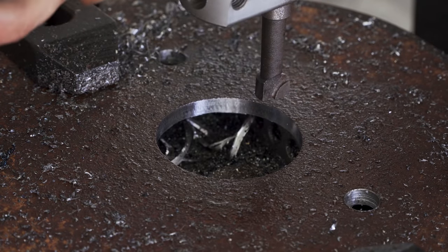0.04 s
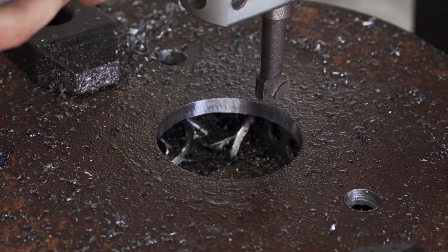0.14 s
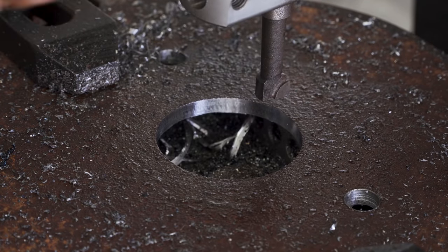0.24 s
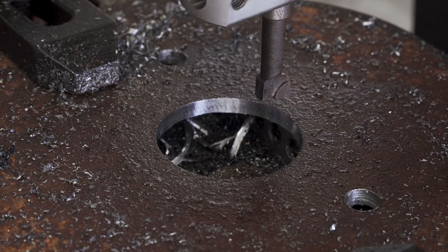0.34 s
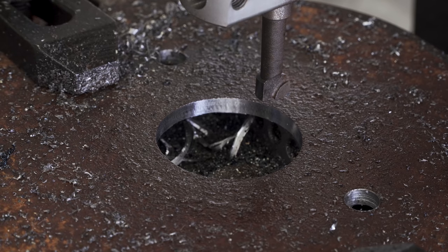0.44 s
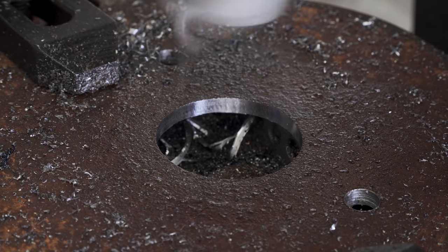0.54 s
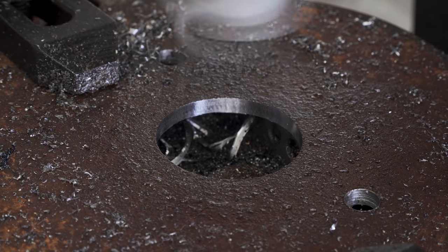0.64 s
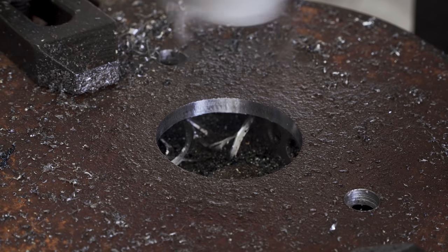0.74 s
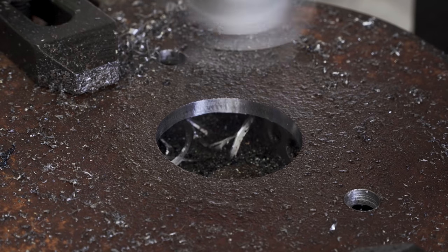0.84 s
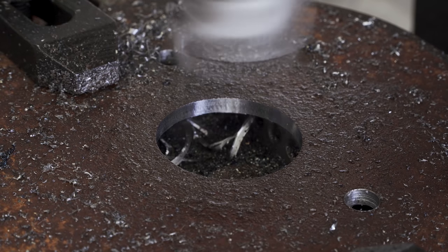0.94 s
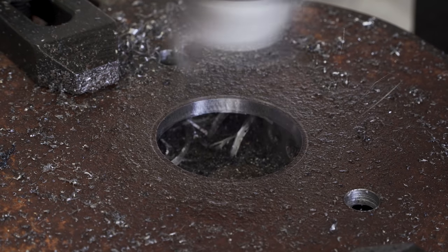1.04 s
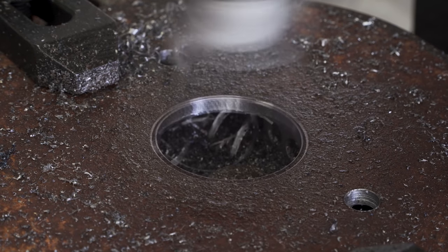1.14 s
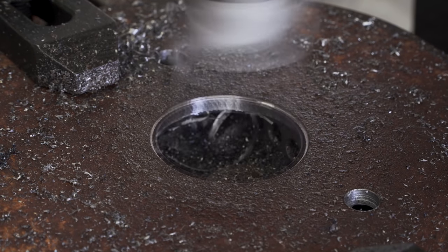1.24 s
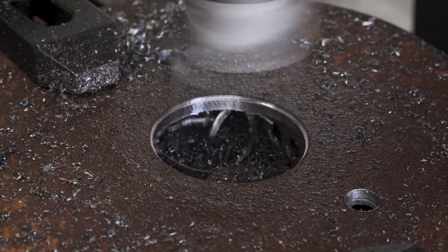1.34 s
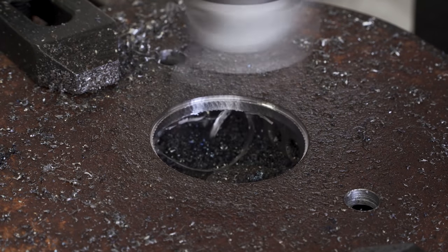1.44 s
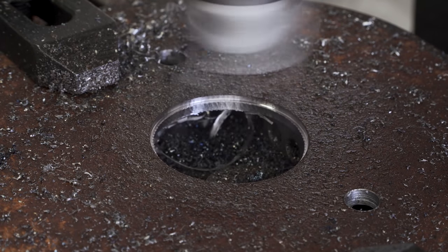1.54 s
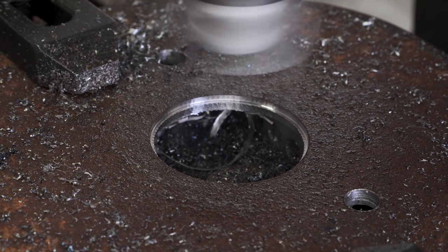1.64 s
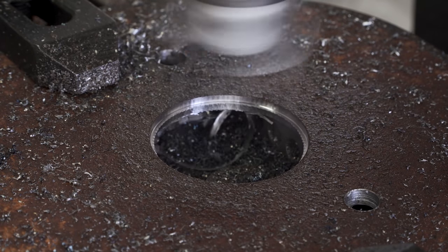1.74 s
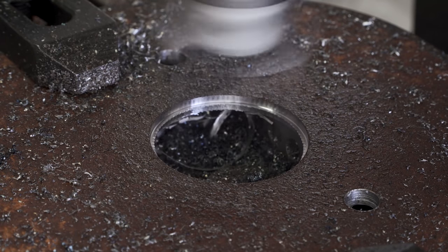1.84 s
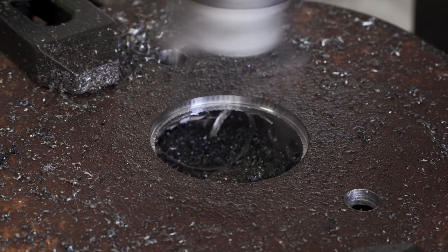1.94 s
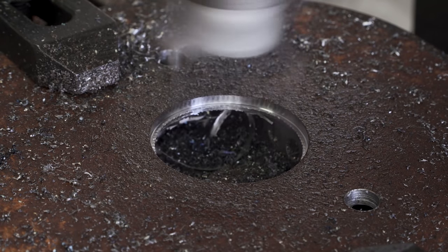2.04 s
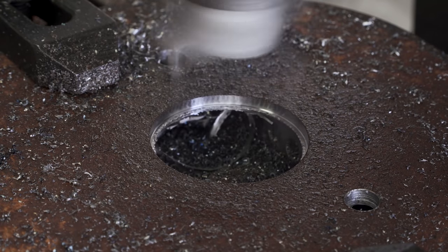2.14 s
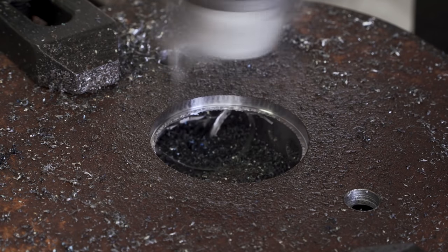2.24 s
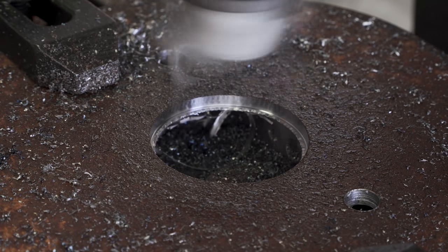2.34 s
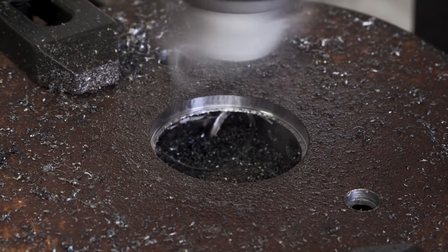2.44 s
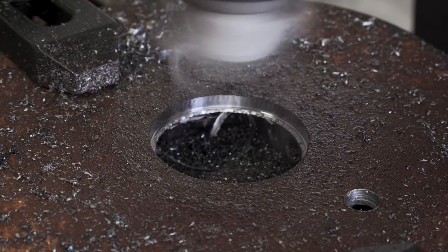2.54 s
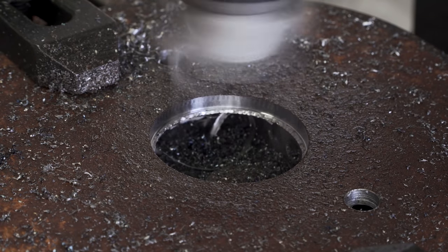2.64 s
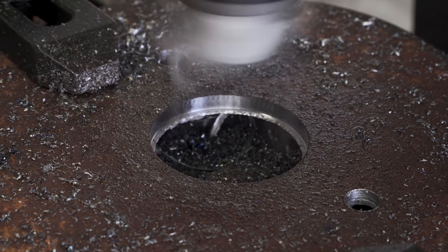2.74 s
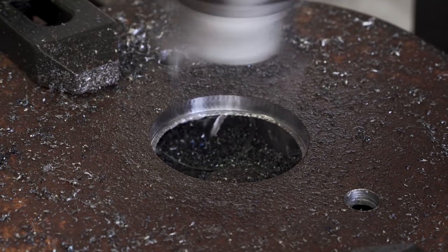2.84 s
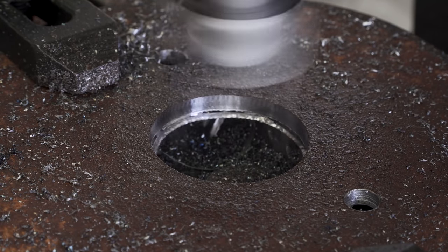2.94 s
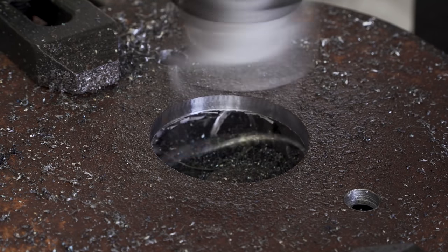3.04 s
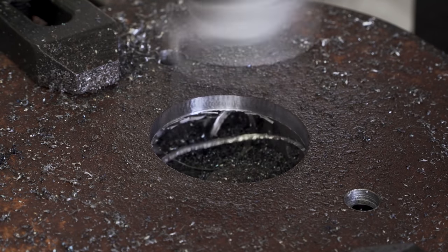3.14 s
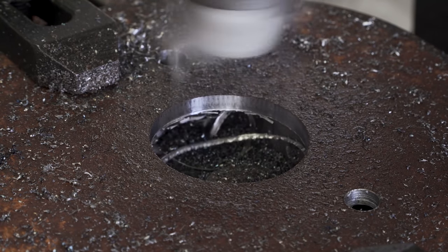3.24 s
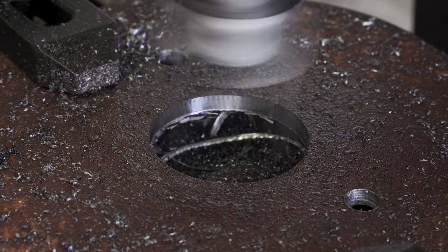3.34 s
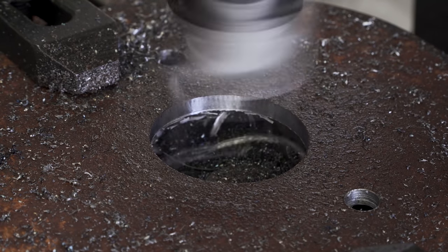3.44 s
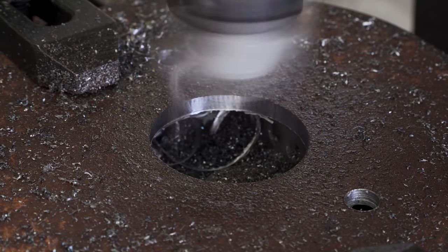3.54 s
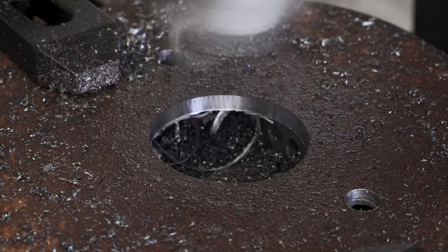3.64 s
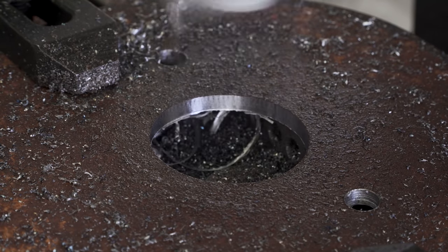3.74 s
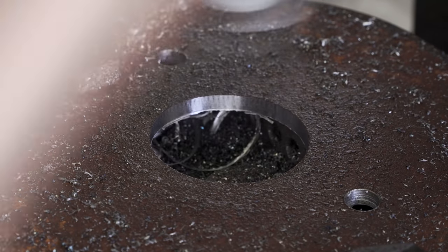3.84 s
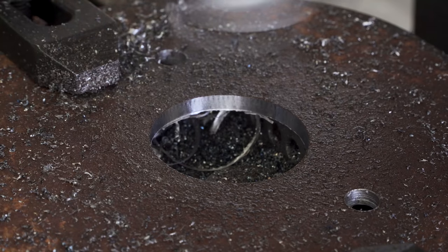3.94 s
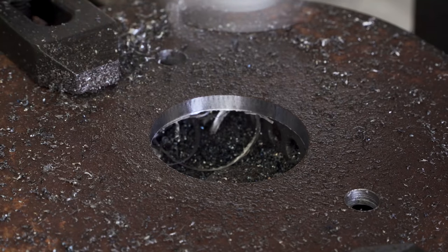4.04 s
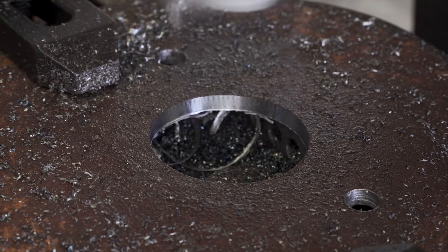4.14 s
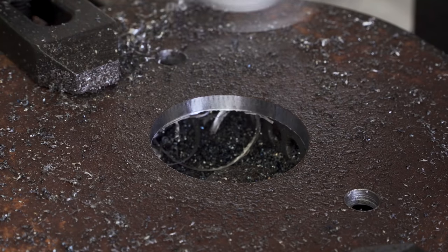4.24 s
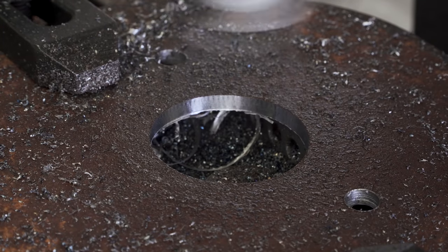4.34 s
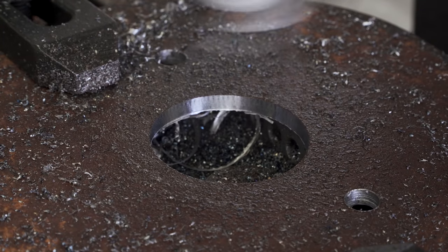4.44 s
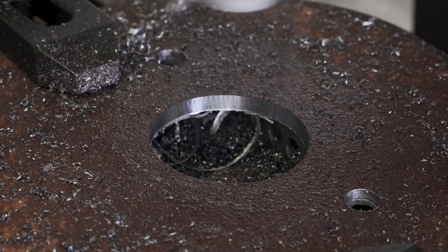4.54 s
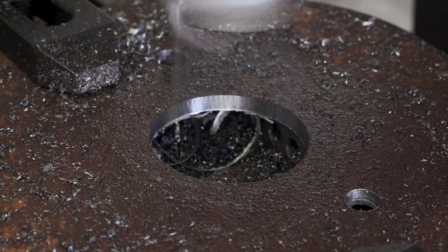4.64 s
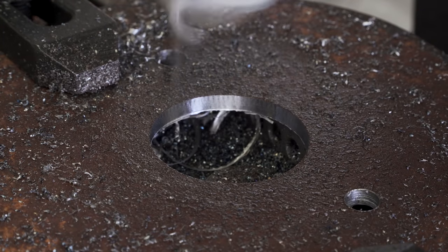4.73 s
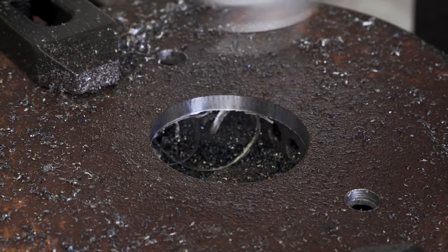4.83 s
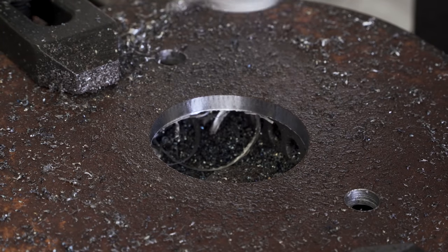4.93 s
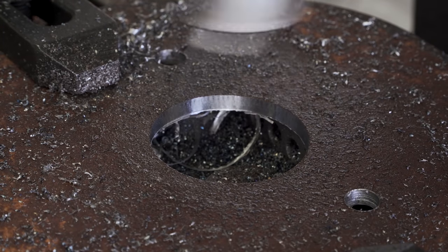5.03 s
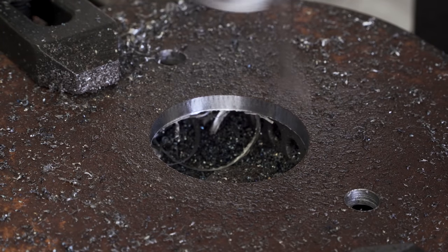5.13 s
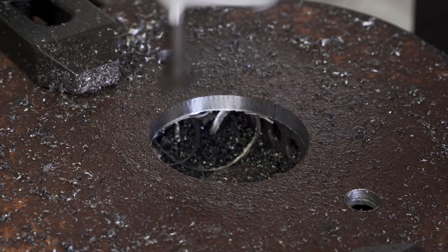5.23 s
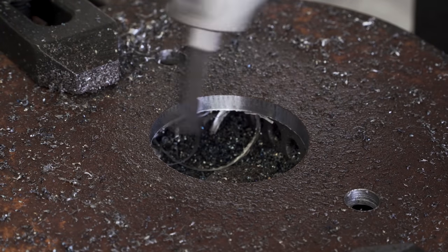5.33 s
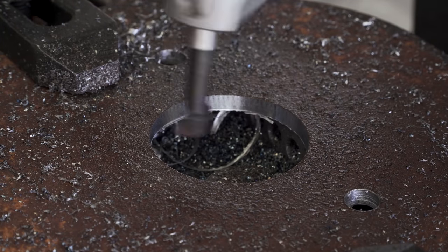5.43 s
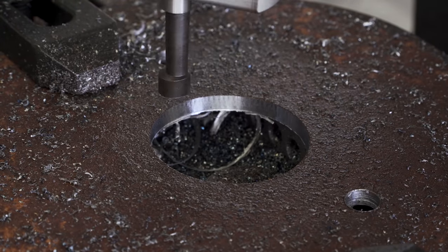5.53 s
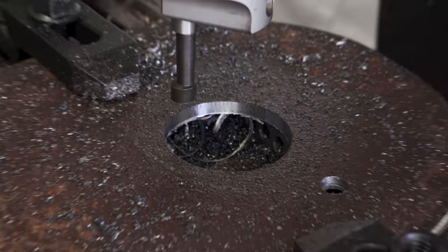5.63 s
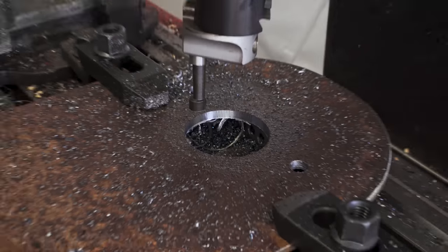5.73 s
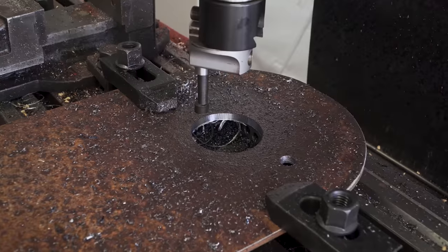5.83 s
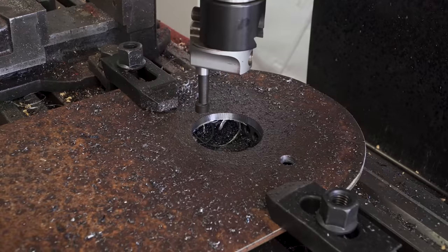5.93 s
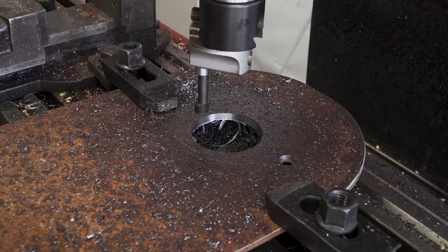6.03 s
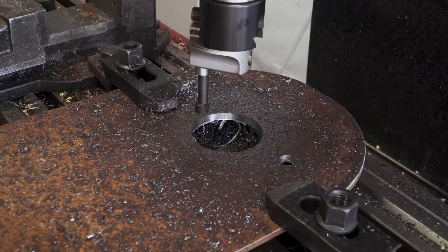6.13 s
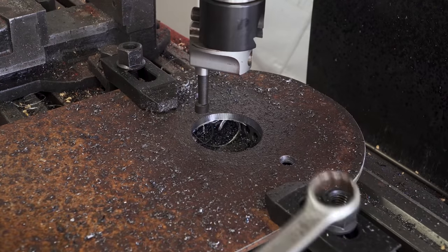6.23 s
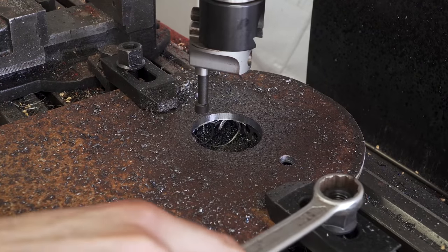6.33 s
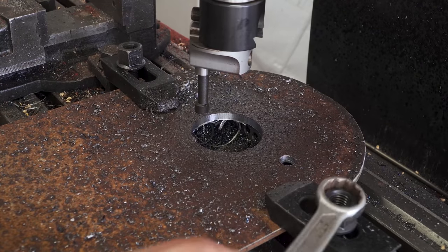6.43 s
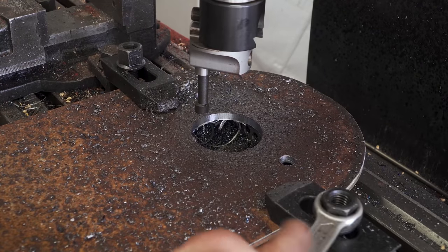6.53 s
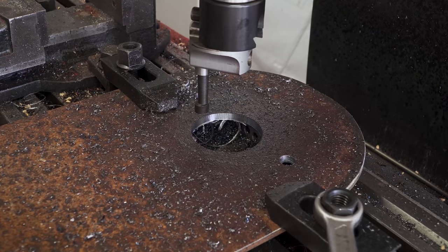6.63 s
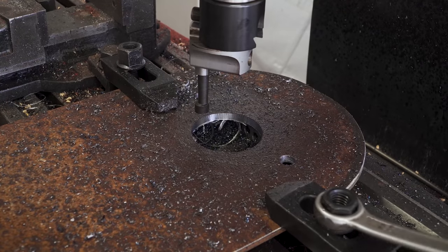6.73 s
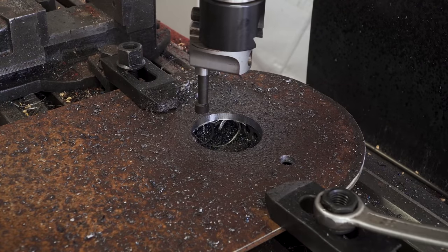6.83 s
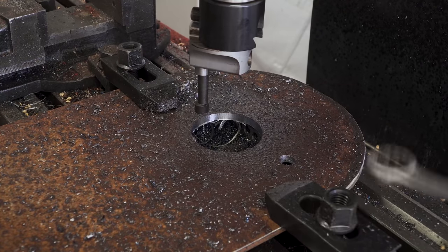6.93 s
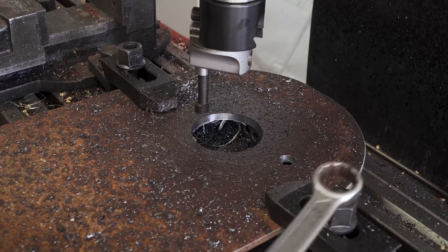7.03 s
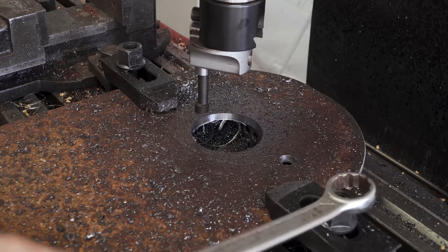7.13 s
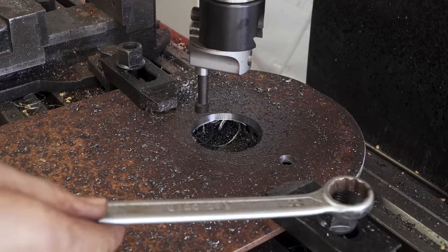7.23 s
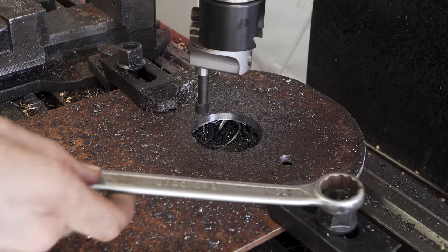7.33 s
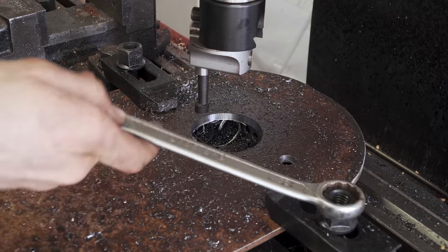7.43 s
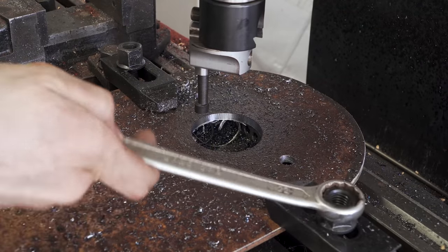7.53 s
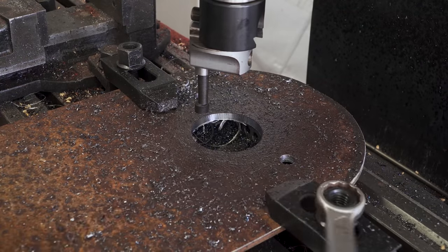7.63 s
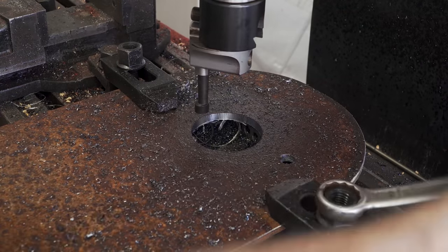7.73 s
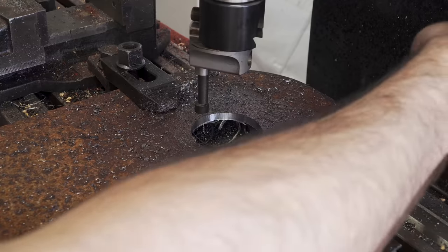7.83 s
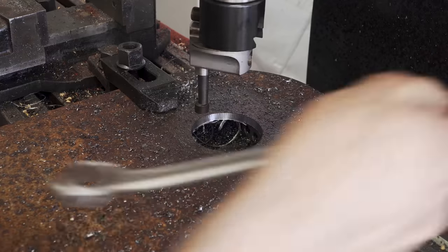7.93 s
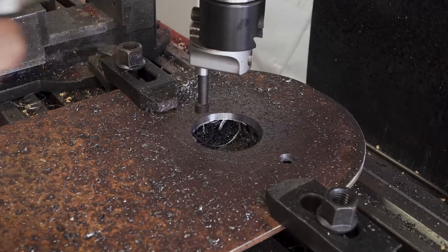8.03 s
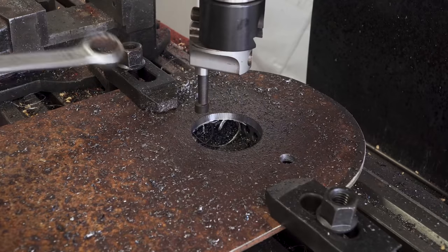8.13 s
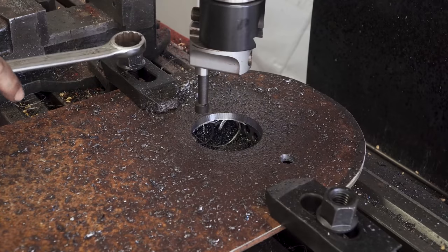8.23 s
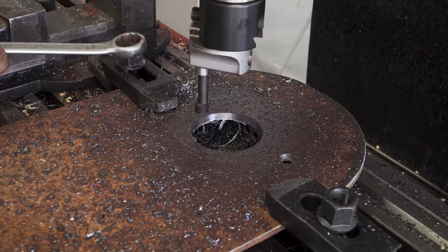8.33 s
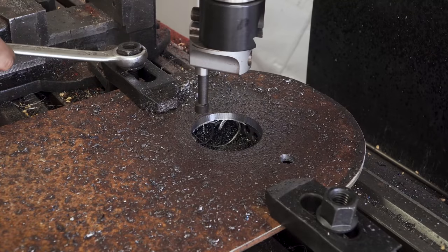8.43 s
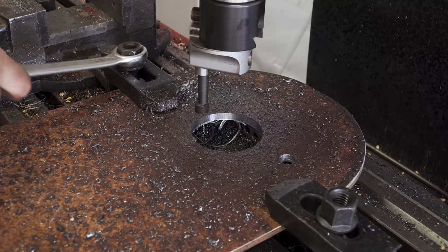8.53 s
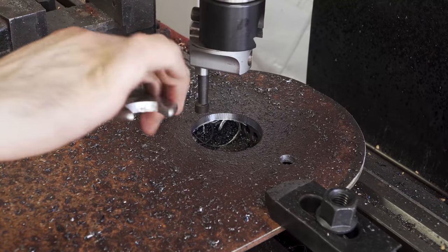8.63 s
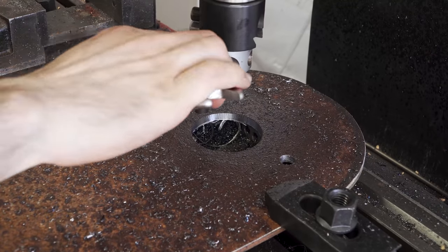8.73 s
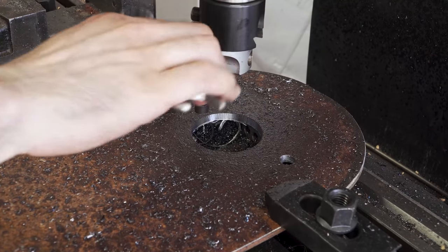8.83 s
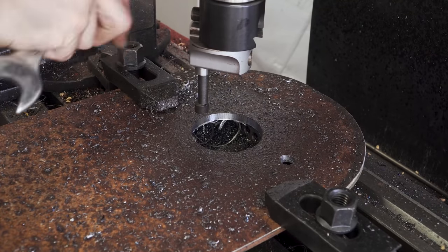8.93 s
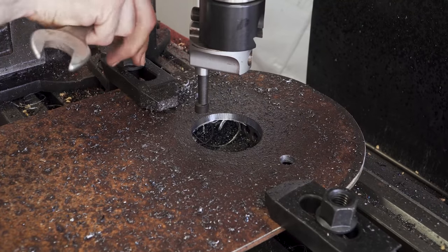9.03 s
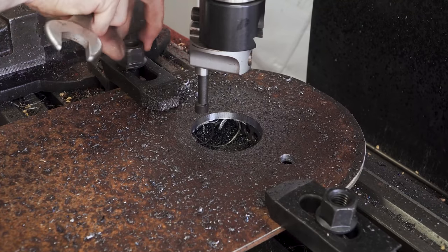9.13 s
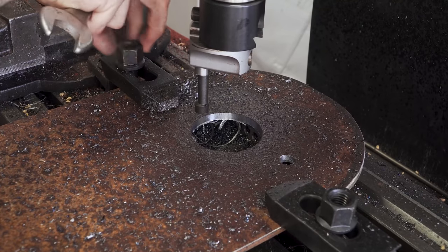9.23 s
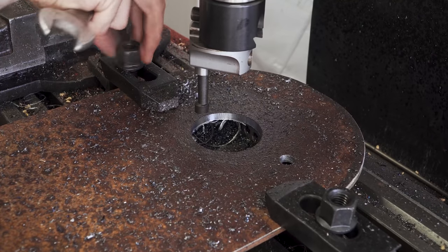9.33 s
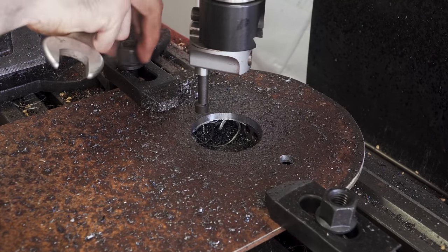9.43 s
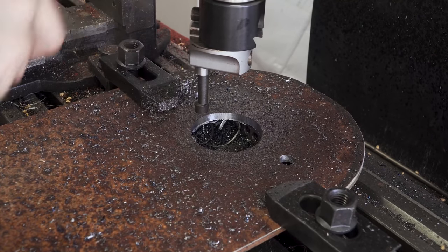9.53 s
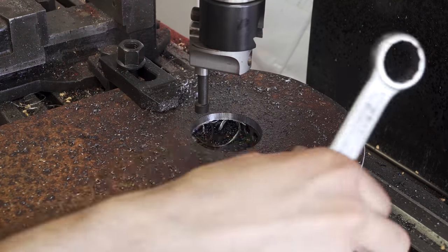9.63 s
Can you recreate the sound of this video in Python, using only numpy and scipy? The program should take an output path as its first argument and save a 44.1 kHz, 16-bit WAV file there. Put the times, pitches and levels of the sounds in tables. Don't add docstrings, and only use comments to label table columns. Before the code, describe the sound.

A machine spindle clunks on and roars, its cutter squealing thinly against steel, then coasts down before a loose spanner knocks and rings on clamp nuts.

```python
import sys
import numpy as np
from scipy import signal
from scipy.fft import rfft, irfft, next_fast_len
from scipy.io import wavfile
from scipy.ndimage import uniform_filter1d

SR = 44100
rng = np.random.default_rng(int(sys.argv[2]) if len(sys.argv) > 2 else 0)


def persist_wave(psi):
    counts = np.round(np.clip(psi, -1, 1) * 32767).astype(np.int16)
    wavfile.write(sys.argv[1], SR, np.atleast_2d(counts).T)


def makeup_ratio(level_db):
    decades = np.asarray(level_db, float) / 20
    return 10 ** decades


N = 426447


def evened(x):
    return x / np.sqrt(np.mean(x ** 2) + 1e-20)


def ramp(t, start, length):
    return np.clip((t - start) / length, 0, 1)


def read(points, hz):
    f, value = np.transpose(points)
    return np.interp(np.log(hz + 1), np.log(f + 1), value)


def columns(rows, t, outside=None):
    s, *values = np.transpose(rows)
    return [np.interp(t, s, v, outside, outside) for v in values]


def peaks(modes, hz):
    return np.sqrt(sum(makeup_ratio(db) ** 2 / (1 + (2 * (hz - f) / width) ** 2) for f, width, db in modes))


def noise(gain):
    t = np.arange(N // 256 + 5) * 256 / SR
    hz = np.fft.rfftfreq(1024, 1 / SR)[:, None]
    a, b = rng.standard_normal((len(t), 513, 2)).T
    return signal.istft((a + 1j * b) * gain(t, hz), nperseg=1024, noverlap=768)[1][:N]


def coloured(x, gain):
    size = next_fast_len(len(x), True)
    return irfft(rfft(x, size) * gain(np.fft.rfftfreq(size, 1 / SR)), size)[:len(x)]


def waver(length, step):
    knots = rng.standard_normal(int(length / SR / step) + 2)
    return np.interp(np.arange(length) / SR / step, np.arange(len(knots)), knots)


ON_S, BITE_S, LIFT_S, OFF_S = .56, 1.1, 2.7, 4.29
BITE_TAKES_S, LIFT_TAKES_S, COAST_PER_S, COAST_EASES = .12, .22, .97, .22
LOADED = .987
TURN_HZ = 129.3


def shaft(t):
    load = ramp(t, BITE_S, BITE_TAKES_S) - ramp(t, LIFT_S, LIFT_TAKES_S)
    since = np.clip(t - OFF_S, 0, 2)
    speed = 1 - .03 * (1 - ramp(t, ON_S, .06)) - (1 - LOADED) * load
    speed = speed - COAST_PER_S * since + COAST_EASES * since ** 2
    return np.maximum(speed, .05), load


GEAR_HZ = 150
# centre_hz, width_hz, level_db
CASING_PEAKS = [(445.5, 20, -6.5), (800, 36, -3.5), (1600, 100, -5), (1135, 31, -14.5), (5270, 87, -9.5),
                (2045, 160, -4.5), (2420, 83, 0.0), (2765, 640, 0.5), (3745, 300, 2.5), (4300, 24, -13.5),
                (4230, 130, -3), (4400, 37, -2.5), (4860, 1700, -8.5), (5560, 46, -17.5),
                (9040, 290, -21.5)]


def tones(lines, speed, waver_db, casing_share, blur):
    slow = speed[::64]
    fine = np.arange(len(speed)) / 64
    turns = np.cumsum(speed) / SR
    coast = np.maximum(.98 - slow, 0)
    out = 0
    for hz, db in lines:
        swell = (peaks(CASING_PEAKS, hz * slow) / peaks(CASING_PEAKS, hz)) ** casing_share
        swell *= makeup_ratio(waver_db * waver(len(slow), 0.028 / 64))
        unbalance_db = 13 * np.minimum(coast / .1, 1) * (hz < GEAR_HZ)
        gear_loss_db = 14 * np.minimum(coast / .25, 1) * (GEAR_HZ < hz < 4 * GEAR_HZ)
        swell *= makeup_ratio(unbalance_db - gear_loss_db)
        drift = (0.14 + 1.45 * coast) * np.minimum(hz / 1500, 1) * waver(len(slow), .035 / 64)
        drift += rng.random()
        drift += blur * hz / 5000 * waver(len(slow), 0.0033 / 64)
        swell, drift = (np.interp(fine, np.arange(len(v)), v) for v in (swell, drift))
        out = out + makeup_ratio(db + 6.5) * swell * np.sin(2 * np.pi * (hz * turns + drift))
    return out


WARM_S, WARM_LOW_DB, WARM_HIGH_DB = 0.036, 22.5, -27
LOW_DB, SLOW_LOW_DB = 2.5, 30
HIGH_DB, SLOW_HIGH_DB, LOAD_HIGH_DB, BITE_HIGH_DB = -3, -14, 5.5, 7
BANDING = 1.1
DRIVEN_DB, LOAD_DAMPS_DB, OFF_DROP_DB, DYING_DB = -1.5, -5.5, -7, -30
FREE_BLUR, CUT_BLUR, COAST_BLUR = .08, .1, .16
MESH_HZ, MESH_DB = 98.9, -63.5
MESH_ORDERS = (6, 7, 9, 10, 11, 12)
# time_s, level_db; the level drops steeply near 1.1 s
ROAR = [(.56, -33), (.575, -13.5), (1.09, -16.5), (1.14, -21), (1.19, -31), (3.0, -32), (4.6, -28),
        (5.0, -29.5), (5.36, -33), (5.55, -45), (5.6, -68)]
# pitch_hz, level_db (per Hz)
CASING = [(24, -76), (40, -52), (194, -31), (337, -28), (392, -23.5), (646, -17), (790, -12), (990, -6.5),
          (1590, -9), (1900, -8), (3830, 2), (5440, -0.5), (8550, -7), (10700, -8.5), (16000, -22.5)]
# centre_hz, width_hz, depth (0-1)
NOTCHES = [(2256, 90, .5), (3240, 160, 0.2), (5500, 130, .3)]
# pitch_hz, level_db
FREE_LINES = [(131, -81), (198.5, -75.5), (495, -62.5), (398.4, -61.5), (791.3, -47.5), (1680, -55.5),
              (3068, -49.5), (3268, -54.5), (3418, -54.5), (3935, -46.0), (4221, -54.5), (4484, -46.5),
              (4619, -49.5), (4996, -48.5), (5259, -46), (5572, -49.5), (5701, -47.5), (5814, -50.5),
              (6368, -48.5), (7472, -59.0), (7736, -53.5), (10325, -53.5)]
# pitch_hz, level_db
CUT_LINES = [(780.6, -58), (931, -64.5), (1071, -67), (1378, -60.5), (2654, -70.5), (2912, -63.5),
             (2993, -61.5), (3203, -59), (3402, -52.5), (3849, -67), (4517, -45), (5125, -49),
             (5577, -53.5), (5706, -47.5), (6379, -45.5), (6514, -42), (7564, -52)]
# free_pitch_hz, level_db, after_off_s, spread_s
COAST_LINES = [(3268, -43.5, .32, .05), (3268, -50, .18, .08), (4484, -47, .16, .09), (5259, -50, .2, .08),
               (5700, -45, .1, .09), (5700, -45, .26, .07), (5700, -43, .39, .04), (6650, -52, .07, .05),
               (6950, -47, .25, .06), (6600, -46, .49, .04), (7736, -46, .33, .06), (7470, -47, .6, .04),
               (495, -62, .13, .06), (692, -63, .39, .05), (791, -62, .3, .05), (791, -62, .53, .04)]


def spindle():
    def colour(t, hz):
        speed, load = shaft(t)
        warm = np.exp(-np.maximum(t - ON_S, 0) / WARM_S)
        bite = np.exp(-((t - BITE_S - .04) / 0.045) ** 2)
        low = LOW_DB + WARM_LOW_DB * warm + SLOW_LOW_DB * (1 - speed) ** 2
        high = HIGH_DB + WARM_HIGH_DB * warm + SLOW_HIGH_DB * (1 - speed)
        high = high + LOAD_HIGH_DB * load + BITE_HIGH_DB * bite
        place = np.interp(hz, [330, 420, 900, 3000, 6000, 9500, 14000], [.85, 0, 0, 1, 1, 2, 3])
        tilt = sum(np.maximum(1 - abs(place - k), 0) * c for k, c in ((0, low), (2, high), (3, high - 3)))
        bands = peaks(CASING_PEAKS, hz)
        bands = bands / uniform_filter1d(bands, size=35, axis=0)
        for f, width, depth in NOTCHES:
            bands = bands * (1 - depth / (1 + (2 * (hz - f) / width) ** 2))
        return makeup_ratio(read(CASING, hz) + tilt) * bands ** (BANDING + (1 - speed) / 2)

    first, last = round(ROAR[0][0] * SR), round(ROAR[-1][0] * SR)
    t = np.arange(first, last) / SR
    speed, load = shaft(t)
    roar = noise(colour)[first:last]
    roar /= np.sqrt(uniform_filter1d(roar ** 2, size=8000))
    throb = 1 + 0.14 * np.cos(2 * np.pi * np.cumsum(speed * TURN_HZ / LOADED) / SR)
    flutter = makeup_ratio(0.43 * (2.0 - speed) * waver(len(t), 0.019))

    since = np.maximum(t - OFF_S, 0)
    driven_db = DRIVEN_DB - 6 * (1 - ramp(t, ON_S, 0.3)) + LOAD_DAMPS_DB * load
    driven_db = driven_db + OFF_DROP_DB * ramp(t, OFF_S, 0.11) + DYING_DB * since ** 2.8
    free_lines = FREE_LINES + [(k * MESH_HZ, MESH_DB) for k in MESH_ORDERS]
    free = tones(free_lines, speed, 3.0, 0.8, FREE_BLUR) * makeup_ratio(driven_db)
    off = since > 0
    for hz, db, top, spread in COAST_LINES:
        meeting = np.exp(-((since[off] - top) / spread) ** 2 / 2)
        free[off] += tones([(hz, db + 4)], speed[off], 3.2, 0, COAST_BLUR) * meeting
    chip = makeup_ratio(1.2 * waver(len(t), 0.055))
    cut = tones(CUT_LINES, speed / LOADED, 3.2, 0, CUT_BLUR) * load * chip
    out = np.zeros(N)
    mix = makeup_ratio(-0.5) * roar * throb * flutter + makeup_ratio(31.5) * free + makeup_ratio(33.5) * cut
    out[first:last] = makeup_ratio(columns(ROAR, t)[0]) * mix
    return out


THRUM_DB, RUB_DB, RUB_LIFT_DB, CLEAR_S = -54.5, -56, 17, 3.04
GRAZE_DB_PER_S, GRAZE_SAG_DB_PER_S = 1298, 120
GRAZE_SQUEAL_DB, GRAZE_THRUM_DB, GRAZE_RUB_DB = -35.5, -53.5, -48
RUB_LEAD_S = .025
# time_s, level_db
CHATTER = [
    (1.0, -60),
    (1.06, -27.5),
    (1.3, -23),
    (1.8, -21.5),
    (1.9, -30.5),
    (2.6, -58),
    (3.03, -44),
    (3.06, -80),
]
# start_s, length_s, level_db
TOUCHES = [
    (3.172, .002, 4.5),
    (3.275, .15, 1.5),
    (3.688, .004, 1.5),
]


def contact(t):
    lift = ramp(t, LIFT_S, CLEAR_S - LIFT_S)
    thrum_db = THRUM_DB - 25 * (1 - ramp(t, 1.0, .08)) - 30 * lift ** 3 - 30 * (t > CLEAR_S)
    rub_db = RUB_DB + RUB_LIFT_DB * lift ** .7 - 30 * ramp(t, CLEAR_S, .02)
    levels = [columns(CHATTER, t)[0], thrum_db, rub_db]
    for s, length, db in TOUCHES:
        after = t - s - length
        near_db = db - GRAZE_DB_PER_S * np.maximum(np.maximum(s - t, after), 0)
        rub_near_db = db - GRAZE_DB_PER_S * np.maximum(np.maximum(s - RUB_LEAD_S - t, after), 0)
        sag_db = GRAZE_SAG_DB_PER_S * np.maximum(t - s, 0)
        graze = [GRAZE_SQUEAL_DB + near_db - sag_db,
                 GRAZE_THRUM_DB + 0.94 * near_db - 0.54 * sag_db,
                 GRAZE_RUB_DB + rub_near_db]
        levels = np.maximum(levels, graze)
    return levels


SQUEAL_HZ, CREEP_HZ_PER_S, LIFT_HZ = 12412, 12, 314
# pitch_hz, level_db
SQUEAL_LINES = [(11892, -51), (12032, -46), (12161, -37), (12290, -34), (12419, -33), (12548, -31),
                (12667, -46), (12812, -51)]


def cutter():
    t = np.arange(SR, 4 * SR) / SR
    squeal_db, thrum_db, hiss_db = contact(t)
    turns = np.cumsum(TURN_HZ * shaft(t)[0] / LOADED) / SR
    carrier_hz = SQUEAL_HZ + CREEP_HZ_PER_S * (t - 1) + LIFT_HZ * ramp(t, LIFT_S, LIFT_TAKES_S)
    carrier = np.cumsum(carrier_hz + 14 * waver(len(t), .012)) / SR
    squeal = 0
    for hz, db in SQUEAL_LINES:
        k = round((hz - SQUEAL_HZ) / TURN_HZ)
        phase = 2 * np.pi * (carrier + k * turns) + 0.38 * k ** 2
        squeal = squeal + makeup_ratio(db + 2.3 * waver(len(t), 0.0098)) * np.cos(phase)
    shake = evened(coloured(rng.standard_normal(len(t)),
                            lambda hz: peaks([(149.7, 1200, 0)], hz) ** 2 * np.minimum(hz / 70, 1) ** 2))
    thrum = np.sin(2 * np.pi * turns) + makeup_ratio(-4.0) * np.sin(4 * np.pi * turns) + makeup_ratio(-7.5) * shake
    hiss = evened(coloured(rng.standard_normal(len(t)), lambda hz: peaks([(14200, 6100, 0)], hz) ** 3))
    touch = makeup_ratio(hiss_db) * hiss + makeup_ratio(squeal_db) * evened(squeal) + makeup_ratio(thrum_db + 1.0) * thrum
    out = np.zeros(N)
    out[SR:SR + len(t)] = touch
    return out


RING_WAVER_DB = 2.2


def rings(rows):
    out = np.zeros(N + SR)
    for start, stop, hz, db, t60 in rows:
        length = stop - start
        t = np.arange(round((length + 0.0083) * SR)) / SR
        grip = np.clip((length + 0.0044 - t) / 0.012, 0, 1) * np.minimum(t / 0.0022, 1)
        beat_db = RING_WAVER_DB * waver(len(t), 0.016) * (t60 > .4)
        out[round(start * SR):][:len(t)] += makeup_ratio(db - 60 * t / t60 + beat_db) * grip * np.sin(2 * np.pi * hz * t)
    return out[:N]


# time_s, level_db, length_s
START = [
    (0.561, -1.5, 0.017),
]
# start_s, stop_s, pitch_hz, level_db, t60_s
START_RINGS = [
    (.562, .62, 320, -27, .15),
    (.5645, .597, 800, -14, .5),
    (.561, .592, 2450, -13, .1),
    (.596, .633, 3740, -16, .5),
    (4.295, 4.335, 310, -56, .2),
    (5.53, 5.592, 800, -53, .5),
]


def clunk():
    def casing(hz):
        modes = [(800, 300, -12.5), (350, 230, -8.5), (2630, 640, 2.0)]
        return peaks(modes, hz) * np.minimum(hz / 260, 1) ** 2

    out = np.zeros(N)
    t = np.arange(4096) / SR
    for s, db, length in START:
        burst = rng.standard_normal(4096) * makeup_ratio(-60 * t / (3 * length))
        slam = evened(coloured(burst, casing)) / 4 * (1 - ramp(t, .05, .02))
        out[round(s * SR):][:4096] = makeup_ratio(db - 11.0) * slam
    return out + rings(START_RINGS)


DAMPED_HZ = 48
DENSE_DB, RAGGED_DB = -7, 3.7
SWELL_POWER, RATTLE_FALL = 1.7, 1.05
STRIKE_SPREAD_DB, STRIKE_DETUNE = 2.5, .012
# pitch_hz, level_db (per Hz)
STEEL = [(120, -69.5), (200, -32), (548, -28.5), (791, -27.5), (1480, -29.5), (2250, -1), (3250, 0.5),
         (4270, -2), (9580, -3.5), (14000, -16), (16000, -36)]
# centre_hz, width_hz, level_db
TABLE = [(780, 40, -10.5), (1058, 300, -18), (500, 250, -29)]


def knock(modes, rise, db, treble_db, length, chance, burst):
    t = (np.arange(len(burst)) - 1024) / SR
    hz = np.fft.rfftfreq(len(burst), 1 / SR)
    swell_db = 10 * (np.maximum(-t, 0) / max(rise, .0003)) ** SWELL_POWER
    fall_db = swell_db + 11 * (np.maximum(t, 0) * 6 / max(length, .004)) ** RATTLE_FALL
    ragged = np.repeat(burst[::-40], 40)[:len(t)]
    rattle = burst * makeup_ratio(RAGGED_DB * ragged - np.minimum(fall_db, 150))
    body = 0
    for (f, width, level), c in zip(modes, chance):
        tuned_hz = f * (1 + STRIKE_DETUNE * np.tanh(chance[-1] - c))
        body = body + makeup_ratio(level + STRIKE_SPREAD_DB * c) / (1 + 2j * (hz - tuned_hz) / max(width, DAMPED_HZ))
    body = body * np.clip(hz / 1750, 0, 1) ** 3
    table = sum(makeup_ratio(level) / (1 + 2j * (hz - f) / width) for f, width, level in TABLE)
    table = table * np.clip(hz / 400, 0, 1) ** 2
    tilt = makeup_ratio(1.3 * (treble_db + 9.5) * np.clip(np.log2(hz / 3500 + 1e-9), 0, 1))
    patches = makeup_ratio(2.6 * np.interp(hz / 260, np.arange(100), burst[:100]))
    dense = patches * makeup_ratio(read(STEEL, hz) + DENSE_DB)
    sound = irfft(rfft(rattle) * tilt * (body + table + dense), len(burst))
    return makeup_ratio(db - 5) * sound / np.sqrt(uniform_filter1d(sound ** 2, size=90).max())


STRIKE_RISE_S, SLIDE_RISE_S = 0.0016, 0.0068
# centre_hz, width_hz, level_db
GRIPS = [
    [(3760, 1000, 1)],
    [(2054, 58, -4), (2475, 33, -10), (3620, 73, 13), (3870, 55, 6), (4340, 40, -5), (4770, 60, -1),
     (5570, 60, -8), (6530, 30, 0), (6910, 54, 1.5), (8490, 80, -5), (9880, 120, 2), (11400, 120, -3)],
    [(1850, 28, -3), (2470, 34, 6.5), (3285, 90, 17), (3760, 110, 4), (3940, 46, -9), (4660, 30, -10),
     (4880, 60, 6), (5600, 42, 2), (6400, 45, -10), (7650, 64, -18), (8910, 110, -4), (9400, 80, 1),
     (9870, 80, 0)],
    [(990, 930, 1), (1860, 80, -1), (3290, 57, 3), (3800, 200, 5), (4930, 90, -12)],
]
# centre_hz, width_hz, level_db
FAR_GRIPS = [
    [(2253, 71, 17.5), (3500, 74, -2), (4730, 100, 4), (6560, 90, -9), (7500, 110, -12)],
    [(2280, 37, -3), (3195, 40, 16.5), (3550, 46, 0), (4190, 40, -7), (6500, 110, 6), (6750, 52, -3),
     (7200, 53, 0), (11000, 120, 0)],
    [(1110, 69, -1.5), (2300, 40, 2), (3170, 96, 4), (3570, 160, 4), (4580, 110, -1), (5850, 160, 2),
     (6550, 120, 4), (6880, 49, 0), (7310, 47, -11), (8650, 100, -10), (9700, 170, -13), (11300, 150, -11)],
    [(1110, 46, 11), (2150, 58, 13), (2980, 40, 6.5), (3430, 57, -5), (4570, 90, -4)],
    [(1080, 42, 8), (2180, 33, 5.5), (2510, 75, 9), (2920, 27, 6), (4440, 33, 6), (6040, 130, 0),
     (6440, 46, -1), (6690, 40, -11), (8360, 40, -16)],
    [(1090, 69, 4.5), (2020, 100, 1), (2570, 78, 0.5), (3040, 350, 3), (3740, 92, 0.5), (5240, 60, -3),
     (5660, 160, -18), (6340, 50, -2), (6560, 47, 4.5), (7170, 150, -5), (11000, 92, -17)],
]
# centre_hz, width_hz, level_db
SCUFF_GRIP = [(1900, 440, -18), (1200, 500, 2)]
# peak_s, level_db, treble_db, rattle_s
TICKS = ([(.11, -44, -20, .015), (.184, -44, -19, 0.015), (.246, -52, -14, .01), (.3, -52, 8, .015),
          (.5, -54, -20, .01), (.537, -44, 0, 0.015), (5.968, -55, 8, .006), (6.087, -48, 0, .02),
          (5.553, -42, -16, 0.018)], [(5.625, -47.5, 0, 0.069)])
# peak_s, level_db, treble_db, rattle_s
FIT = ([(6.2774, -39, -9, 0.14), (6.3205, -11, -2.5, 0.075), (6.3775, -22, -2, 0.04),
        (6.3994, -18.5, -29, 0.02), (6.4975, -8.5, -9, 0.045), (6.5185, -9, -11, 0.045)],
        [(6.2192, -37, -2, .045), (6.3416, -26.5, -21, 0.098), (6.529, -12, -16, 0.018),
        (6.389, -21, -8, .07), (6.479, -30, -14, .06), (6.4905, -21, -12, .012)])
# peak_s, level_db, treble_db, rattle_s
TURN = ([(6.9088, -35.5, -3, .042), (6.951, -17, -14, 0.03), (7.0905, -13, 0, 0.14),
         (7.275, -41, -12, 0.43), (7.3784, -19, -8, 0.036), (7.593, -40, -16, .02), (7.563, -37, -8, 0.025),
         (7.455, -16, -14, 0.011), (7.4707, -11, -14, 0.05), (7.5283, -15, -20, .019)],
         [ (6.7, -39, 2, .12), (7.087, -29, 0, .006), (7.128, -17, -8, 0.06), (7.1478, -19, 4, 0.035),
         (7.1729, -23.5, -8, 0.062), (7.1902, -25.5, -13, 0.026), (7.2048, -30, -26, 0.039),
         (6.871, -26, -20, 0.039), (7.3285, -15, -13, 0.073), (7.3385, -11, -9, 0.052),
         (7.3709, -23, -20, 0.015), (7.414, -20, -18, 0.05), (7.4856, -14, -9.5, 0.016)])
# peak_s, level_db, treble_db, rattle_s
DRAG = ([(8.8, -48, -10, 0.03), (6.9, -45, -12, .02)], [(6.78, -50, -16, .1), (6.817, -47, -6, .04),
         (7.645, -43, -12, 0.3), (7.79, -44, -16, .03)])
# peak_s, level_db, treble_db, rattle_s
LIFT = ([(7.8451, -34, -4, 0.018), (7.855, -33, -20, .03), (7.8636, -35, -9, 0.02)],
         [(7.8911, -19, -19, 0.025)])
# peak_s, level_db, treble_db, rattle_s
TRY = ([(8.2454, -13.5, 3, 0.026), (8.252, -18, -6, 0.057)], [(8.3025, -30, -11, 0.065)])
# peak_s, level_db, treble_db, rattle_s
SEAT = ([(8.3408, -13.5, -14, 0.009), (8.3553, -13.5, -22, 0.014), (8.388, -14, -3, 0.015),
         (8.4091, -11.5, -16, .015), (8.476, -17, -10, 0.04)], [(8.4838, -9.5, 0, 0.065),
         (8.336, -29, -10, .03)])
# peak_s, level_db, treble_db, rattle_s
SETTLE = ([(8.5265, -32, -12, 0.023), (8.5657, -37, -22, 0.039), (8.5753, -36, -15, 0.057)],
           [(8.5444, -38, 5.9, .029)])
# peak_s, level_db, treble_db, rattle_s
SLIP = ([(8.8395, -38, -11, .03)], [(8.8466, -37, -5, 0.032), (8.884, -26, -5, 0.073),
         (8.8962, -19.5, -4.5, 0.017)])
# peak_s, level_db, treble_db, rattle_s
SPIN = ([(9.1372, -36, -13, 0.073), (9.16, -42, -19, .03), (9.1944, -16, -11, .025),
         (9.2698, -27, -10, 0.056), (9.3006, -26.5, -11, 0.064), (9.344, -26.5, -16, 0.035),
         (9.37, -26, -12, 0.04), (9.381, -29, -12, .03), (9.4005, -18, -9, 0.06)],
         [(9.181, -25.5, -13, 0.032), (9.188, -20.5, -8, .02), (9.2141, -30, -23, 0.023),
         (9.2914, -25, -7, .035), (9.3592, -18, -7, 0.037), (9.509, -24.5, -12, 0.032),
         (9.5188, -20.5, -5.5, 0.024), (9.5444, -33.5, -19, 0.025)])
# peak_s, level_db, treble_db, rattle_s
SCUFF = ([(6.165, -39, -22, 0.07), (6.186, -37, -28, 0.04)], [(9.16, -46, -25, .15), (9.215, -37, -25, .06)])
# start_s, stop_s, pitch_hz, level_db, t60_s
RINGS = [(6.33, 6.497, 2475, -44, 2.5), (6.322, 6.376, 6530, -33, 0.25), (6.385, 6.49, 6530, -36, .35),
         (6.52, 6.644, 2470, -26, 0.39), (6.52, 6.63, 6530, -38.5, 0.19), (7.34, 7.4, 800, -54, .6),
         (7.415, 7.54, 800, -49, 2.5), (7.565, 7.593, 780, -46.5, .3), (6.323, 6.36, 3620, -21.5, .2),
         (6.4, 6.56, 788, -53, 2.5), (8.34, 8.39, 2300, -28, 0.29), (8.408, 8.47, 2300, -27, 0.12),
         (9.3, 9.334, 6560, -46.5, 0.12), (9.508, 9.557, 6560, -28, 0.085), (7.091, 7.122, 3285, -18, 0.19),
         (7.185, 7.25, 4880, -41, 0.16), (7.1, 7.21, 5600, -36.5, 0.56), (8.485, 8.56, 1090, -49, .5),
         (8.49, 8.56, 2170, -45, 0.33)]
# time_s, level_db
SCRAPE = [(6.075, -52), (6.2, -53), (6.75, -48.5), (7.0, -61), (7.7, -48), (7.95, -58.5), (8.15, -51.5),
          (9.67, -64)]


def spanner():
    out = np.zeros(N + 8192)
    actions = (TICKS, FIT, TURN, DRAG, LIFT, TRY, SEAT, SETTLE, SLIP, SPIN, SCUFF)
    for action, modes in zip(actions, GRIPS + FAR_GRIPS + [SCUFF_GRIP]):
        for blows, rise in zip(action, (STRIKE_RISE_S, SLIDE_RISE_S)):
            for s, db, treble_db, length in blows:
                chance, burst = rng.standard_normal(14), rng.standard_normal(8192)
                blow = knock(modes, min(rise, length / 2), db, treble_db, length, chance, burst)
                out[round(s * SR) - 1024:][:8192] += blow
    grit = rng.standard_normal(N) * makeup_ratio(4.5 * waver(N, 0.006))
    scrape = evened(coloured(grit, lambda hz: makeup_ratio(read(STEEL, hz))))
    scrape_db = columns(SCRAPE, np.arange(N) / SR, -120)[0] - 9.0
    return out[:N] + rings(RINGS) + scrape * makeup_ratio(scrape_db)


SQUEAK_ROUGH_HZ, SQUEAK_WAVER_DB = 105, 4
# start_s, stop_s, from_hz, to_hz, level_db
SQUEAKS = [
    (6.662, 6.69, 3800, 3780, -54),
    (6.72, 6.825, 3850, 3400, -55),
    (7.62, 7.69, 3250, 3200, -56),
    (7.685, 7.77, 4080, 3800, -52),
    (7.63, 7.735, 9000, 8950, -60),
    (7.78, 7.84, 1900, 2300, -56),
]


def squeaks():
    out = np.zeros(N)
    for start, stop, from_hz, to_hz, db in SQUEAKS:
        count = round((stop - start) * SR)
        hz = np.linspace(from_hz, to_hz, count) + SQUEAK_ROUGH_HZ * waver(count, .003)
        swell = makeup_ratio(db + SQUEAK_WAVER_DB * waver(count, .006)) * np.hanning(count) ** .3
        out[round(start * SR):][:count] += swell * np.sin(2 * np.pi * np.cumsum(hz) / SR)
    return out


CRACK_HZ = 5230
# time_s, level_db
CRACKS = [(8.4823, 1.5), (.5627, -6), (6.4968, -4), (9.1935, -15), (6.3197, -10), (7.0903, -10),
          (7.334, -9), (6.504, -12), (8.2447, -12), (7.4697, -11)]


def cracks():
    out = np.zeros(N)
    t = np.arange(-40, 41) / SR
    click = np.exp(-(t * CRACK_HZ * 1.8) ** 2) * np.cos(2 * np.pi * CRACK_HZ * t + 0.596)
    for s, db in CRACKS:
        out[round(s * SR) - 40:][:81] += makeup_ratio(db) * click
    return out


BUMP_S, BUMP_END_S, BUMP_DB = 5.6, 6.06, -39.5
SHOVE_S, SHOVE_WIDTH_S, SHOVE_DB = 5.79, 0.11, 7.5
# centre_hz, width_hz, level_db
BUMP_MODES = [(46, 18, 3), (96, 6.5, -6.5), (149, 23, -17), (240, 110, -15)]


def stand():
    t = np.arange(N) / SR
    shake = evened(coloured(rng.standard_normal(N),
                            lambda hz: peaks(BUMP_MODES, hz) ** 1.45 * np.minimum(hz / 42, 1) ** 3))
    held = ramp(t, BUMP_S - .02, 0.019) ** 2 * (1 - ramp(t, BUMP_END_S, 0.058)) ** 2
    shove_db = SHOVE_DB * np.exp(-((t - SHOVE_S) / SHOVE_WIDTH_S) ** 2)
    return shake * held * makeup_ratio(BUMP_DB + shove_db)


FAN_S, CHANGE_S = 4.33, 5.58
# pitch_hz, level_db
FAN_LINES = [(129.2, -72), (193.8, -74)]


def fan():
    t = np.arange(N) / SR
    heard = ramp(t, FAN_S, .04) * (t < CHANGE_S) * makeup_ratio(-11 * (t - FAN_S) + 1.7 * waver(N, .06))
    return heard * sum(makeup_ratio(db + 7) * np.sin(2 * np.pi * hz * t) for hz, db in FAN_LINES)


def walls(x):
    t = np.arange(SR // 3) / SR
    tail = rng.standard_normal(len(t)) * makeup_ratio(-60 * t / 0.062) * (t > .003)
    return signal.oaconvolve(x, tail / np.linalg.norm(tail))[:N]


ROOM_DB, BEFORE_DB, SINK_S, SINK_DB_PER_S = -53, -3, 0.72, 4
# pitch_hz, level_db (per Hz)
ROOM = [(12, -35), (20, 6), (138, -6.5), (198, -1.5), (377, -11), (590, -7), (1710, -14.5), (2750, -17.5),
        (12400, -37), (16000, -62)]


def workshop():
    t = np.arange(N) / SR
    hush = evened(coloured(rng.standard_normal(N), lambda hz: makeup_ratio(read(ROOM, hz))))
    hush += makeup_ratio(-10.5) * np.sin(2 * np.pi * 592 * t)
    gain_db = (BEFORE_DB - SINK_DB_PER_S * np.maximum(t - SINK_S, 0)) * (t < CHANGE_S)
    return hush * makeup_ratio(ROOM_DB - 2 + gain_db + waver(N, 0.067))


def scene():
    metal = spanner() + squeaks() + clunk() + cracks()
    machine = spindle() + fan() + cutter() + stand()
    mono = machine + workshop() + metal + makeup_ratio(-10) * walls(metal)
    return np.array([mono, mono])


def band_limit(x):
    return signal.sosfilt(signal.butter(12, 16300, fs=SR, output="sos"), x)


def record(dry):
    side = makeup_ratio(-38 + 8 * waver(N, .025)) * np.roll(dry[0], 300)
    overloaded = np.clip(dry + np.array([side, -side]), -1.1, 1.1)
    low_pass = signal.firwin(767, 15850, window=("kaiser", 9), fs=SR)
    limited = signal.oaconvolve(overloaded, low_pass[None], "same")
    return band_limit(limited)


dry = scene()
out = record(dry)
persist_wave(out)
```